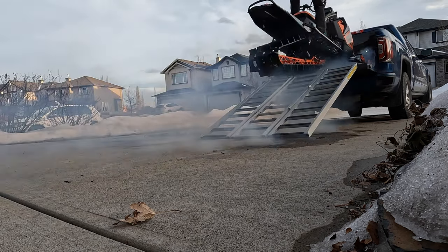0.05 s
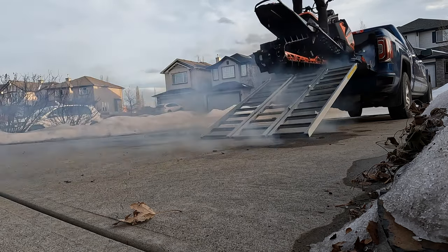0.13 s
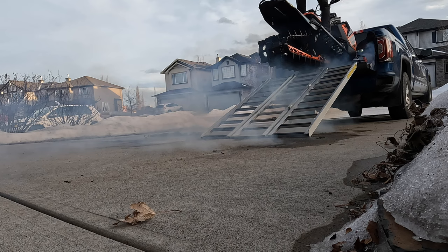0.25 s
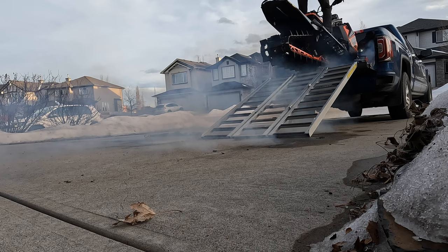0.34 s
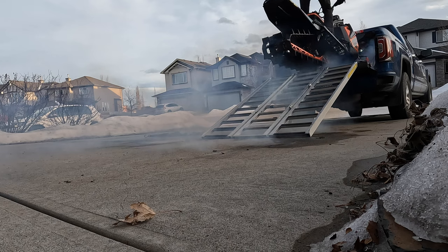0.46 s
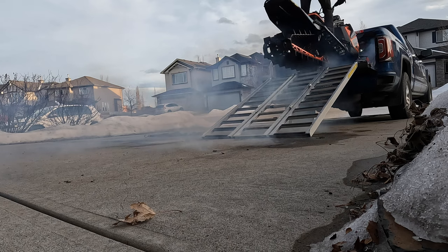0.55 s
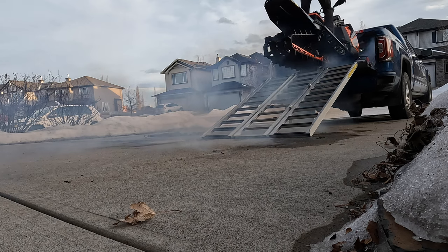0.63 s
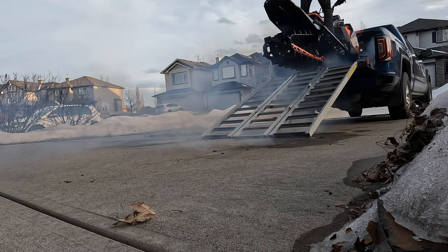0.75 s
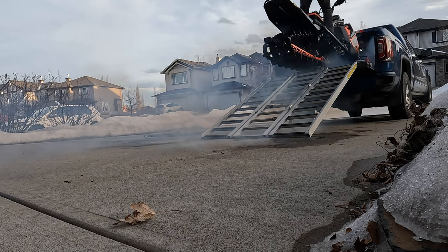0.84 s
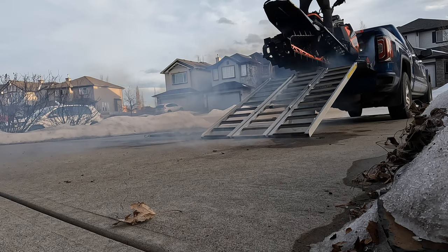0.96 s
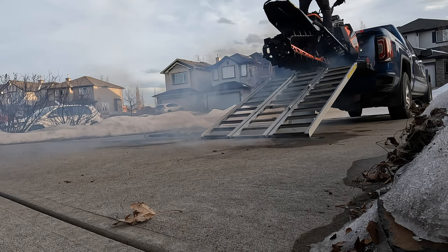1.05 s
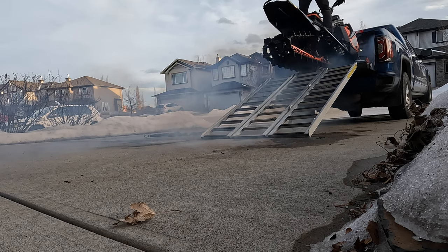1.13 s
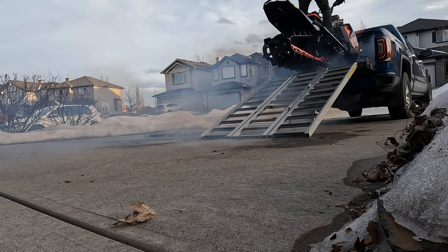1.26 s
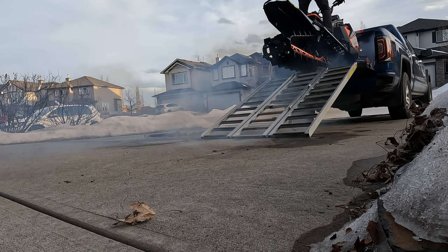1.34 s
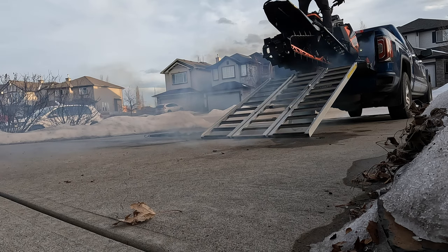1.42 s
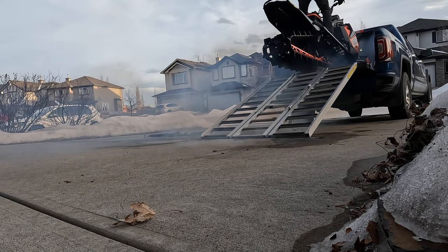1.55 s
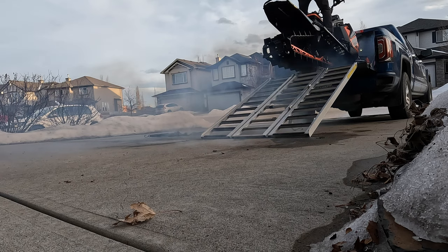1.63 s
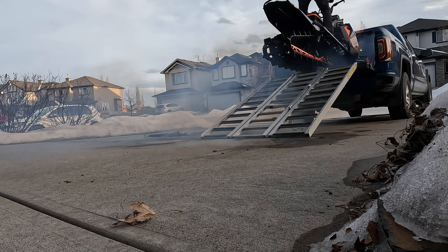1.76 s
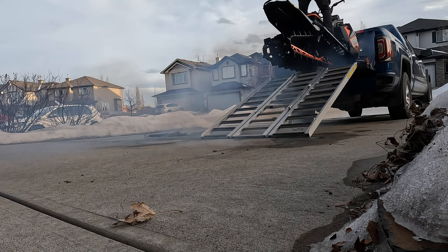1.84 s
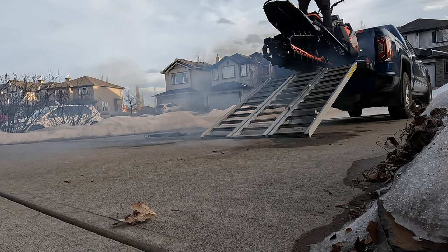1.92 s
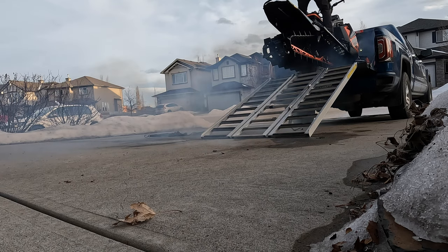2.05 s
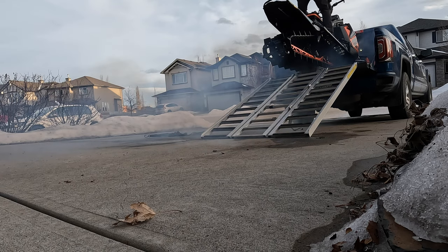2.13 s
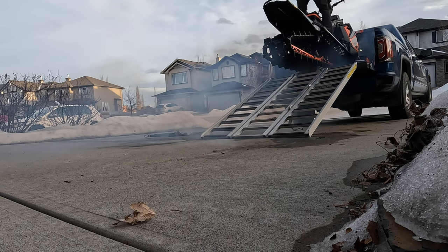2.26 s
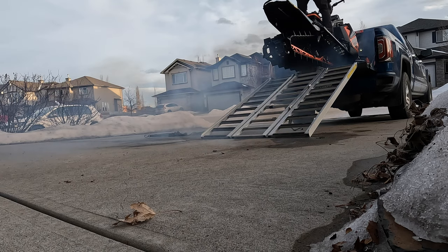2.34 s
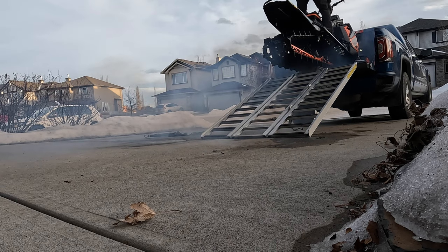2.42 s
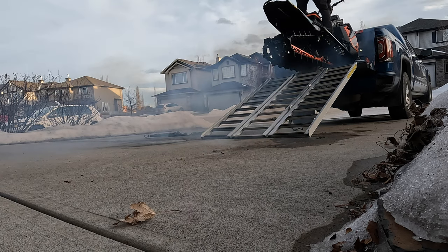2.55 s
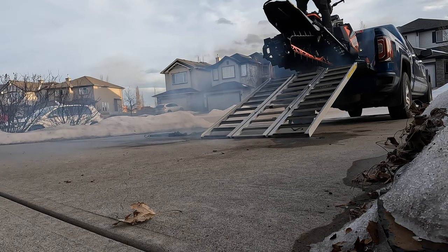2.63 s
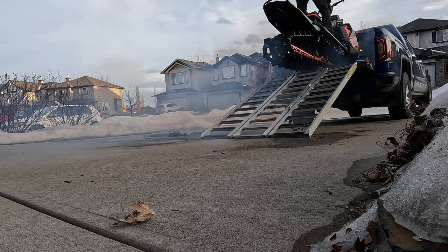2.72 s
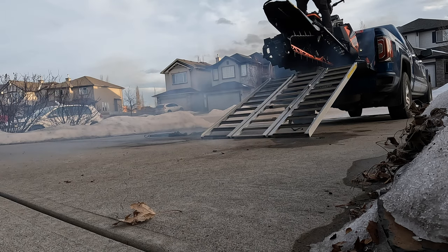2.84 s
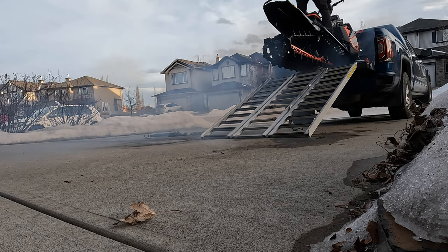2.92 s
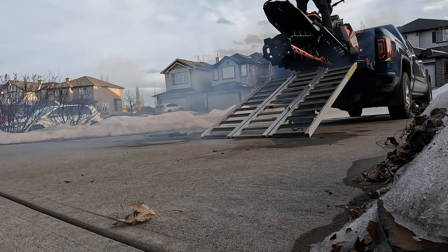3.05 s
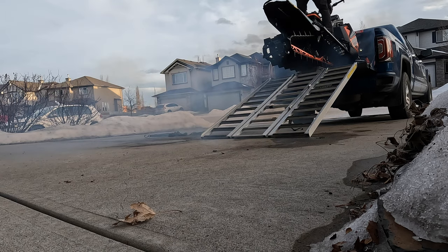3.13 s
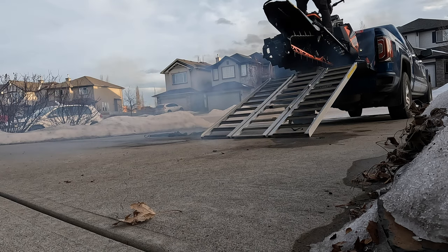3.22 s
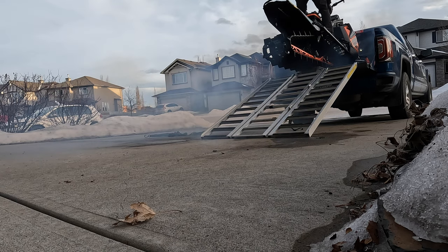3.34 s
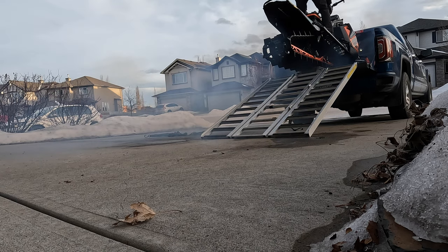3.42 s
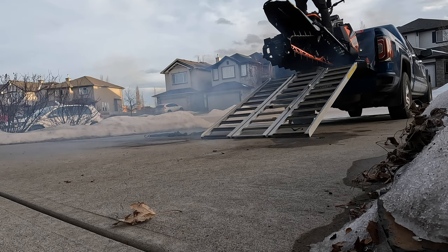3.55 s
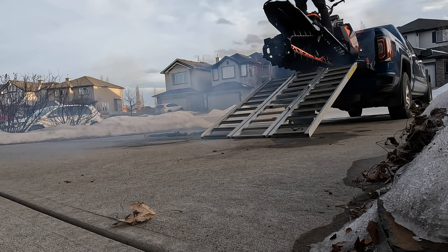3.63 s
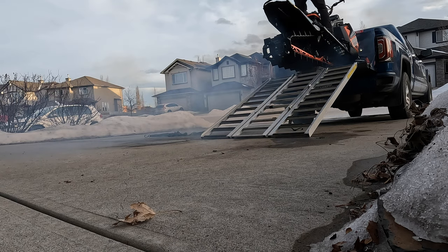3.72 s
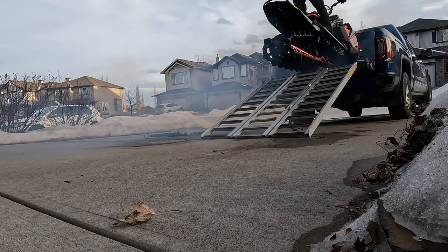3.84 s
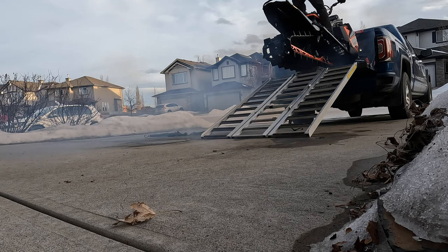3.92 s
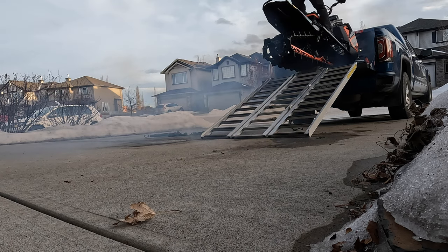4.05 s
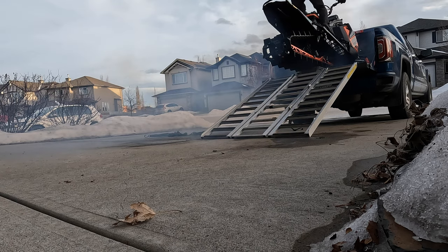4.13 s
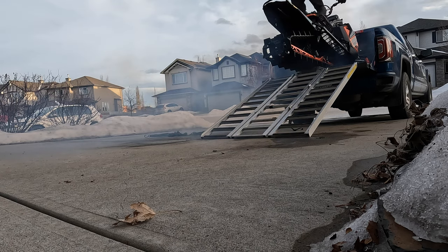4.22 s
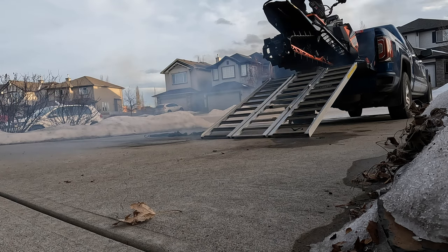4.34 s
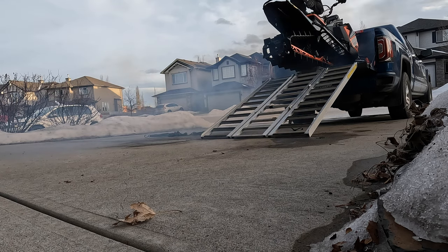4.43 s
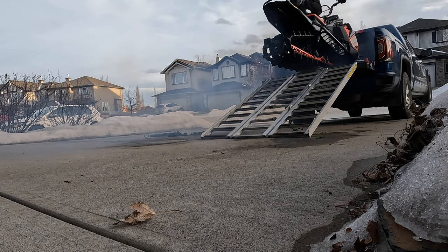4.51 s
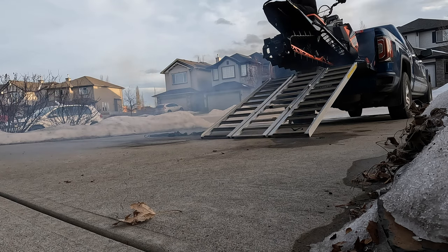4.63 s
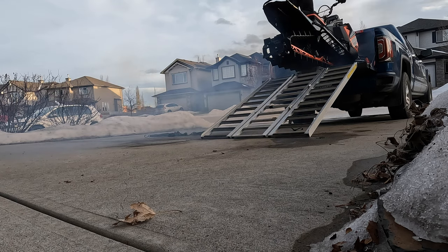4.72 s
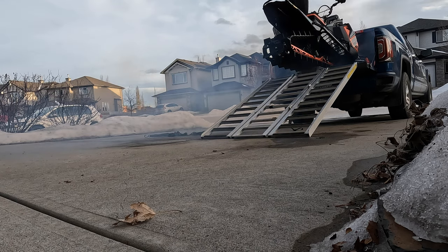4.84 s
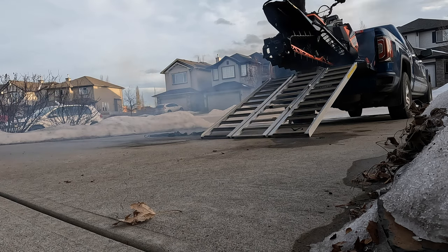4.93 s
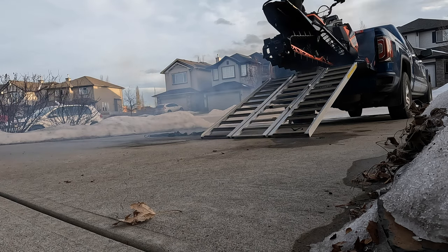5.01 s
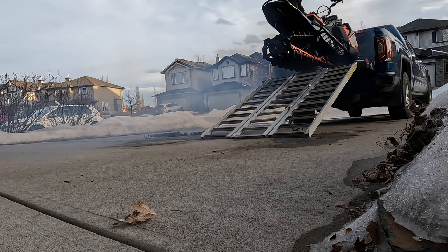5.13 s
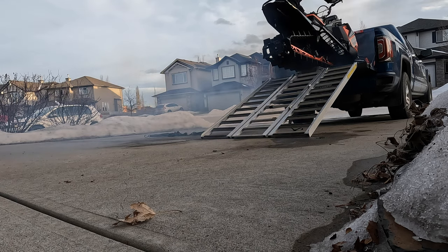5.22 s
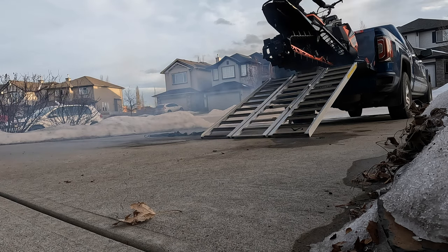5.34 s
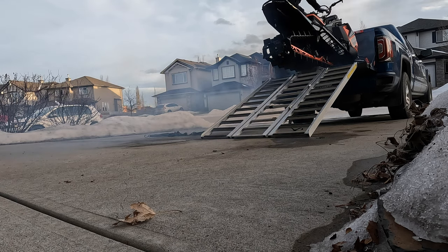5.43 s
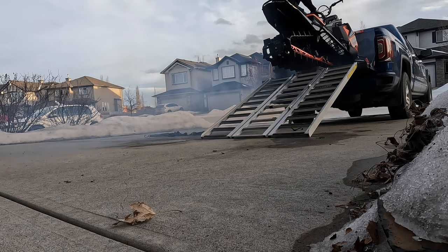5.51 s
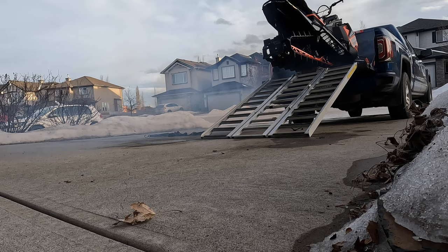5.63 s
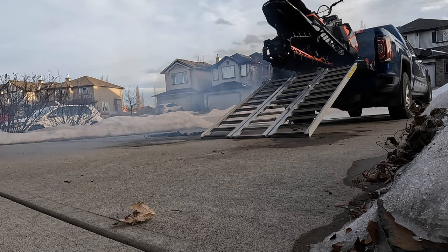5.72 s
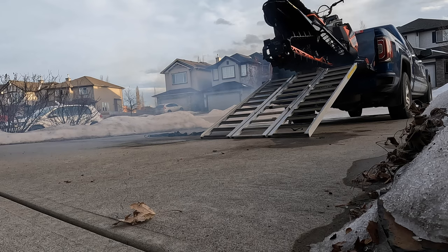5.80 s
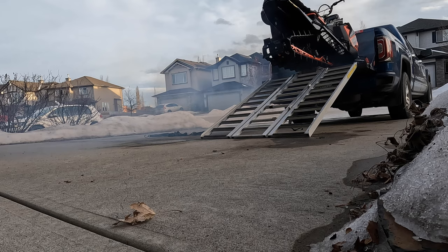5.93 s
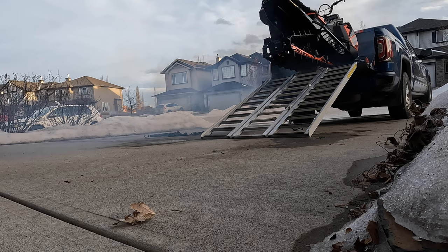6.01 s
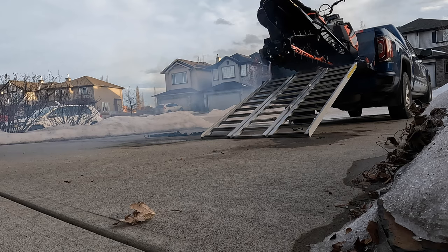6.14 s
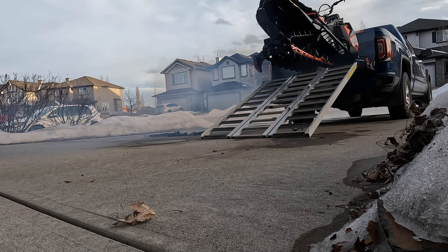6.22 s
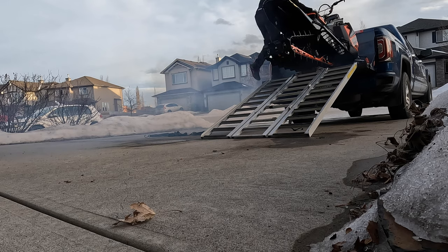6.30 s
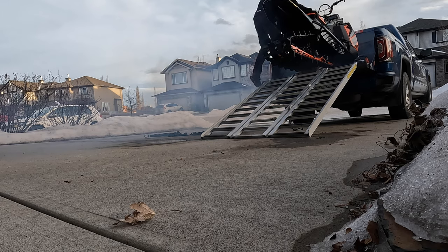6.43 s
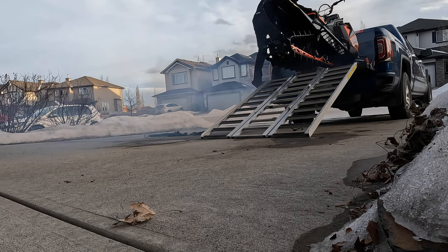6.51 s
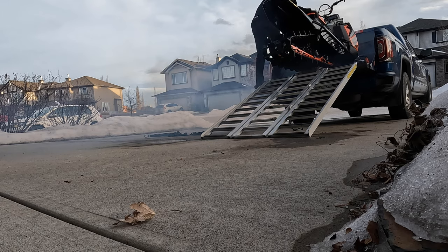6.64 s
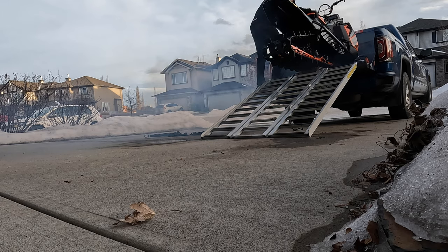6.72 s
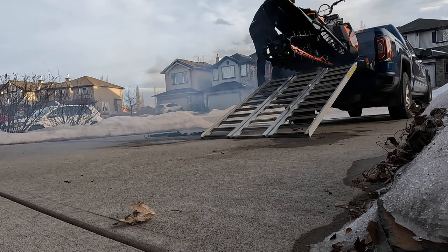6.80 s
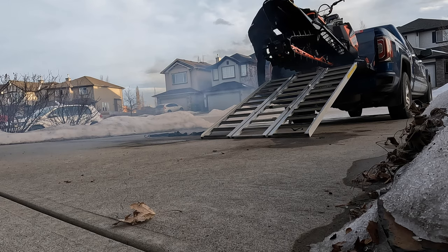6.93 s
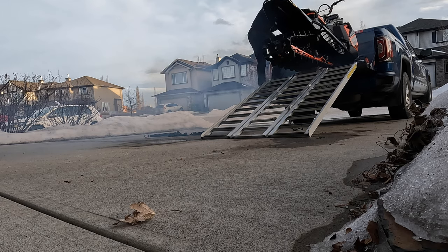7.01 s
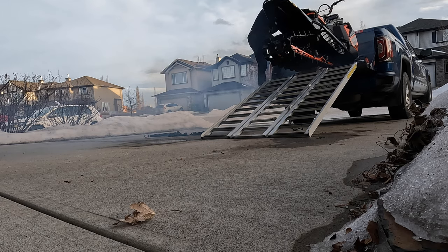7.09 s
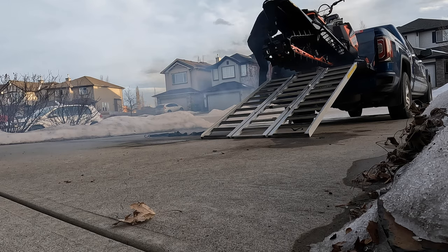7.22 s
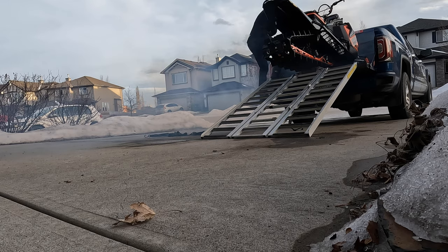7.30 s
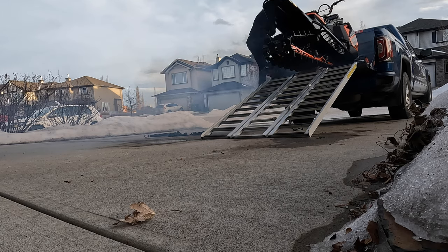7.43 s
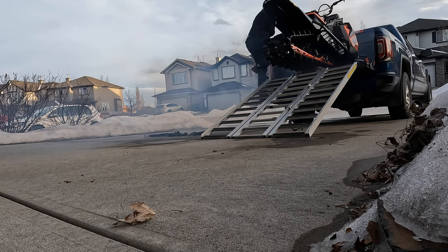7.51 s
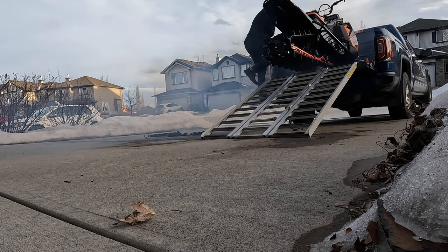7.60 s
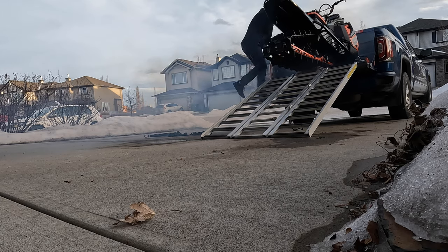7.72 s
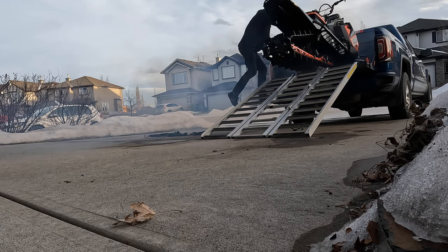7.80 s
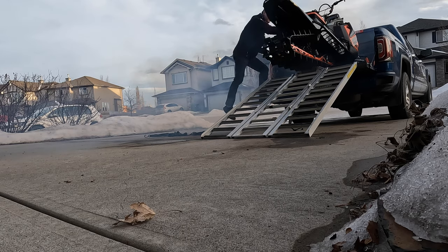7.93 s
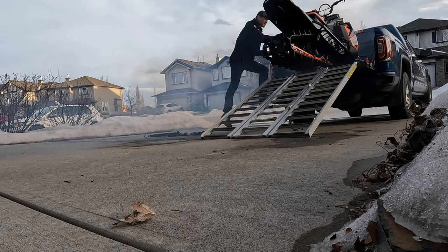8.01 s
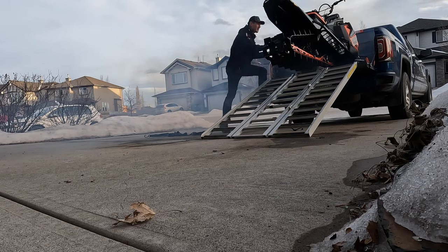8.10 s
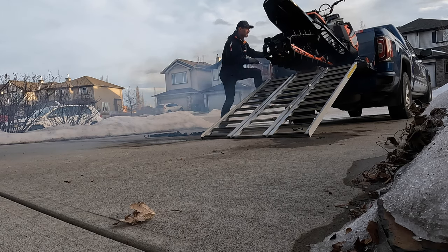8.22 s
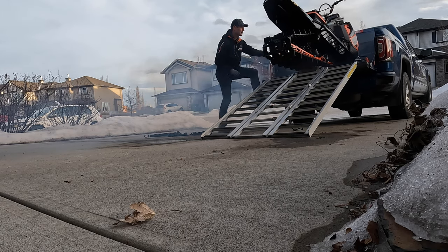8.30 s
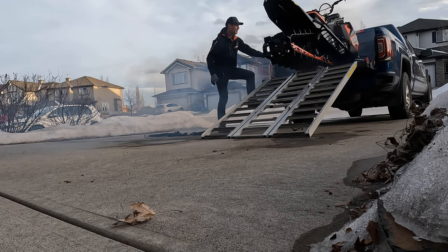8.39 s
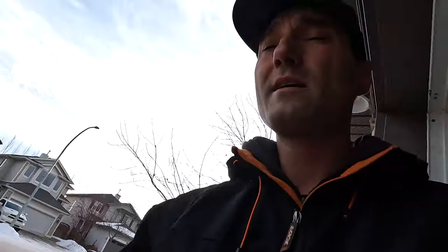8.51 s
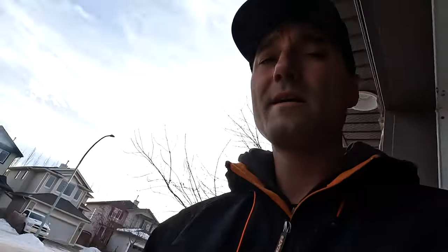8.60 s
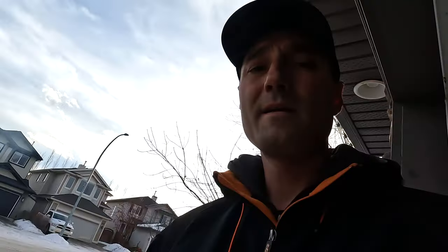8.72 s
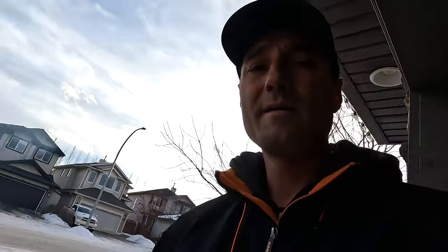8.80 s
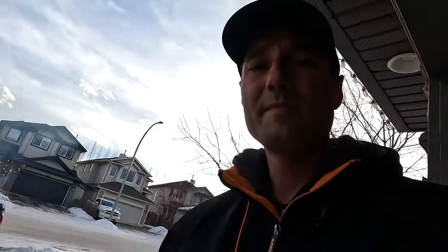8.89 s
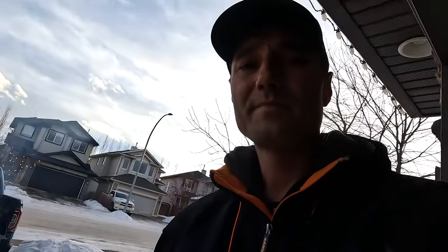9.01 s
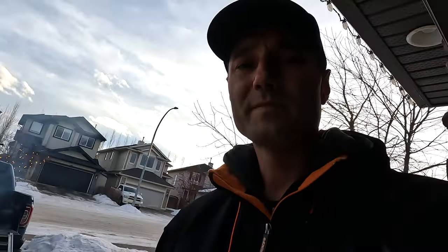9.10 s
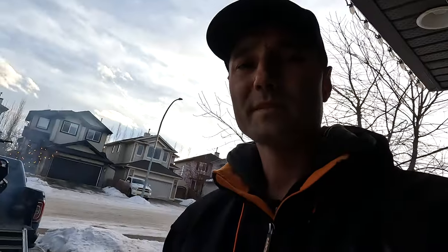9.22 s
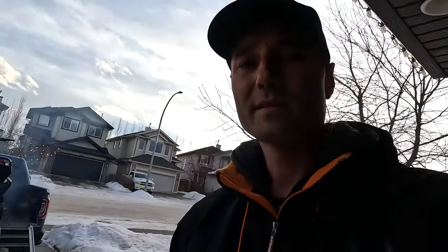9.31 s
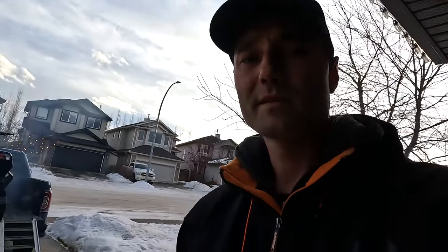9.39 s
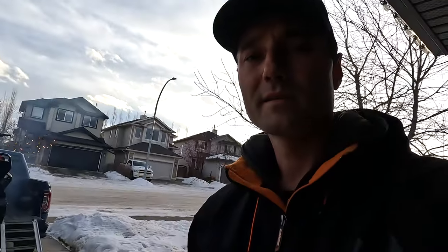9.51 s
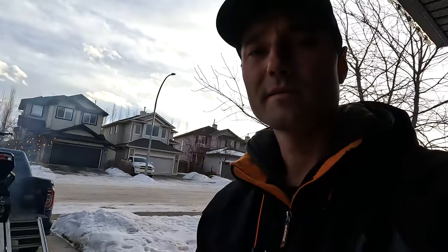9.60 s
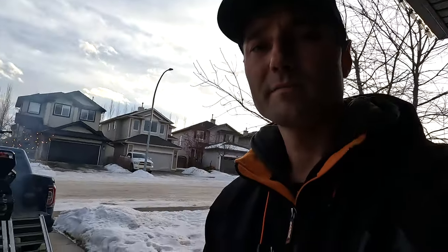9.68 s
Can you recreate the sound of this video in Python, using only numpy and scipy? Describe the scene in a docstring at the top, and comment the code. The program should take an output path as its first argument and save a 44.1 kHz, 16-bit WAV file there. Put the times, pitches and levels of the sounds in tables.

```python
"""A two-stroke snowmobile revs high, falls to a lumpy idle, is switched off and runs down.
It stands on a pickup's loading ramp. Every opening of its exhaust port puffs into the pipe, but the idle
fires only in bouts: a pop, its afterburn, often a second pop. The rider climbs off: boots knock and
scrape on the truck bed and the aluminium ramp, over light wind and far traffic. Then the scene jumps to
a quieter spot, where a jacket rustles."""
import sys
import numpy as np
from scipy import signal
from scipy.fft import rfft, irfft, next_fast_len
from scipy.io import wavfile
from scipy.ndimage import uniform_filter1d

SR = 44100
rng = np.random.default_rng(int(sys.argv[2]) if len(sys.argv) > 2 else 0)


def master(y):
    """Save y as 16-bit WAV."""
    cut = np.clip(np.atleast_2d(y).T, -1, 1)
    pcm = np.round(cut * 32767)  # scale
    wavfile.write(sys.argv[1], SR, pcm.astype(np.int16))


N = 429975
T = np.arange(N) / SR


def gain(db):
    """Turn decibels into a number to multiply by."""
    return 10 ** (np.asarray(db) / 20)

def unit(x):
    """Scale a signal to an average size (rms) of 1."""
    return x / np.sqrt(np.mean(x ** 2))

def curve(table):
    """Join rows of (time, value) with straight lines."""
    return np.interp(T, *np.transpose(table))

def wander(per_s):
    """Glide between random values, per_s of them a second."""
    return unit(np.interp(T * per_s, np.arange(N), rng.standard_normal(N)))

def colour(points, resonances=(), size=16384):
    """Make a filter (an impulse response) from a tone curve with resonant peaks on top."""
    f = np.arange(size // 2 + 1) * SR / size
    hz, db = np.transpose(points)
    db = np.interp(np.log(f + 1), np.log(hz), db)
    for centre, width, lift in resonances:
        db = db + lift / (1 + (2 * (f - centre) / width) ** 2)
    # make the filter ring after a hit, never before it
    cepstrum = irfft(np.log(gain(db)))
    cepstrum[1:size // 2] *= 2
    cepstrum[size // 2 + 1:] = 0
    impulse = irfft(np.exp(rfft(cepstrum)))
    return impulse / np.linalg.norm(impulse)

def through(x, impulse):
    """Pass a sound through a filter."""
    return signal.oaconvolve(x, impulse)[:N]

def noise(points, resonances=()):
    """Steady noise shaped by a tone curve."""
    return unit(through(rng.standard_normal(N), colour(points, resonances)))

def decay(t60, size=16384):
    """A fade that falls 60 dB in t60 seconds."""
    return np.exp(-np.log(1000) * T[:size] / max(t60, 1e-3))

def burst(t60, size=16384):
    """A fading puff of noise."""
    return rng.standard_normal(size) * decay(t60, size)

def swell(start, length, attack, release):
    """A level that rises, holds and dies away; all times in seconds."""
    return np.clip((T - start) / attack, 0, 1) * np.exp(-np.maximum(T - start - length, 0) / release)

def ring(modes, detune=0.023, size=16384):
    """One blow sets an object's notes ringing, a little differently at each contact point."""
    notes = np.zeros(size)
    for hz, db, t60 in modes:
        sign = rng.choice([-1, 1])
        pitch = hz * (1 + detune * rng.standard_normal())
        notes += gain(db) * sign * decay(t60) * np.sin(2 * np.pi * pitch * T[:size])
    return unit(notes) * np.sqrt(1024 / size)

def add(out, s, sound):
    """Mix a sound in at s seconds."""
    i = max(int(s * SR), 0)
    out[i:i + len(sound)] += sound[:N - i]

def taps(hits, tone, rattle_db, rattle_t60):
    """Light hits: each is a click with a short rattle after it."""
    clicks = np.zeros(N)
    for s, db in hits:
        add(clicks, s, gain([db]))
        add(clicks, s, gain(db + rattle_db) * burst(rattle_t60))
    return through(clicks, colour(tone))


# tone of the street at the quieter spot: f/Hz, level/dB
QUIET_TONE = [(8.8, -28), (15, -1.5), (27, -9), (114, -30), (370, -28), (584, -30.5), (778, -23.5),
              (1380, -32.5), (1940, -47), (2180, -45.5), (3250, -54.5), (14000, -72)]
def quiet_street():
    """Faint street noise that sways a little."""
    return noise(QUIET_TONE) * gain(-41.5 + 0.8 * wander(4))

# tone of far traffic: f/Hz, level/dB
TRAFFIC_TONE = [(12, -35), (20, -18), (49, 3.5), (103, -10.5), (136, -8.5), (180, -29.5), (207, -8),
                (382, -21), (533, -19.5), (704, -14), (1200, -14.5), (1580, -24), (2140, -39),
                (2750, -50.5), (9630, -51), (15500, -77.5)]
# how loud the traffic is: t/s, level/dB
TRAFFIC_LEVEL = [(4.6, -42), (5.25, -35.5), (5.8, -35.5), (6.6, -36), (7.6, -34.5), (8.5, -35.5)]
def traffic():
    """Far traffic murmurs and slowly swells."""
    return noise(TRAFFIC_TONE) * gain(curve(TRAFFIC_LEVEL) + 0.8 * wander(4))

def hum(hz=140, db=-40.5):
    """A low hum wavers for a second after the engine stops."""
    tone = unit(np.sin(2 * np.pi * hz * T + 0.58 * wander(5.8)))
    return gain(db) * tone * swell(4.7, 0.93, attack=0.25, release=0.04)

# tone of the wind: f/Hz, level/dB
WIND_TONE = [(15, -4.5), (35, -13), (70, -1), (130, -6.5), (250, -16.5), (500, -18), (1000, -63)]
# how loud the wind is: t/s, level/dB
GUSTS = [(4.55, -35.5), (4.8, -44), (5.28, -35), (5.45, -43), (5.75, -25.5), (6.55, -39), (7.24, -30.5),
         (8.03, -31.5), (8.3, -37.5), (8.5, -33)]
def wind():
    """Gusts rumble on the microphone."""
    return noise(WIND_TONE) * gain(curve(GUSTS))

# swishes of the jacket: t/s, length/s, level/dB
SWISHES = [(8.517, 0.04, -46.5), (8.55, 0.12, -42), (8.698, 0.18, -41)]
# tone of its cloth: f/Hz, level/dB
CLOTH_TONE = [(150, -17), (450, 1), (900, -1), (1800, -2), (2500, -10.5), (4000, -16), (7000, -27.5),
              (10000, -42), (15000, -70)]
def jacket():
    """Stiff cloth creases and folds as its wearer turns."""
    moving = sum(gain(db) * swell(s, length, 0.035, 0.072) for s, length, db in SWISHES)
    return noise(CLOTH_TONE) * moving * unit(gain(wander(500) + wander(59)))

# finger taps: t/s, level/dB
FINGER_TAPS = [(8.606, -16), (8.71, -15), (8.728, -27), (8.967, -18)]
# tone of the grip: f/Hz, level/dB
GRIP_TONE = [(100, -21), (350, 1), (640, 5), (1000, -7), (2000, -22), (5000, -40), (15000, -70)]
def fingers():
    """Fingers shift and tap on the camera's grip."""
    return taps(FINGER_TAPS, GRIP_TONE, rattle_db=-15, rattle_t60=0.052)

# tinks of the zip: t/s, level/dB
ZIP_TINKS = [(8.522, -58), (8.578, -56)]
# the note of its tag: f/Hz, level/dB, ring time/s
ZIP_NOTE = [(2630, 0, 0.2)]
def zip_tag():
    """The jacket's zip tag rings with one high note."""
    tinks = np.zeros(N)
    for s, db in ZIP_TINKS:
        add(tinks, s, gain(db) * ring(ZIP_NOTE, detune=0))
    return tinks

# how loud the rider's clothes rustle: t/s, level/dB
RUSTLE = [(5.6, -68), (5.7, -44), (6.4, -49), (6.55, -57), (7.05, -53), (7.25, -40), (7.65, -48.5),
          (7.9, -54), (8.15, -49), (8.3, -45), (8.39, -36)]
# slides of boots and clothes: t/s, length/s, rub/dB, grit/dB
SLIDES = [(5.106, 0.21, -48.5, -75), (5.722, 0.072, -32, -40), (5.785, 0.074, -35, -59),
          (5.972, 0.18, -38, -51.5), (6.02, 0.021, -36, -40.5), (6.254, 0.014, -23, -29),
          (6.375, 0.012, -42, -47.5), (6.68, 0.021, -65, -56.5), (6.829, 0.029, -42, -47),
          (7.16, 0.017, -31, -67), (7.413, 0.03, -34, -56), (7.467, 0.15, -40.5, -52.5),
          (7.738, 0.031, -35.5, -57), (7.974, 0.048, -44, -55), (8.391, 0.1, -30, -42)]
# tone of rubbing: f/Hz, level/dB
RUB_TONE = [(120, -53.5), (200, 4), (347, -2), (440, -8), (567, -8), (912, -9.5), (1610, -13.5),
            (2870, -17), (7000, -24), (9100, -68), (15400, -120)]
# tone of grit underfoot: f/Hz, level/dB
GRIT_TONE = [(3000, -36), (6000, -2.5), (8000, -3.5), (11000, -8), (13500, -13), (16000, -42)]
# tone of a hard contact: f/Hz, level/dB
CRACK_TONE = [(300, -58.5), (900, 9), (1400, 9.5), (2750, 4), (5400, 5), (7500, 4.5), (10000, -26),
              (15000, -34)]
# high pitches that the ramp boosts: f/Hz, width/Hz, boost/dB
RAMP_PEAKS = [(2400, 170, 0), (2940, 120, 8), (3690, 180, 5.5), (5100, 730, 2)]
def scuffs(grains_per_s=400):
    """Soles slide over the ramp, ringing its rungs and crushing grit; clothes rustle in between."""
    rub = gain(curve(RUSTLE)) * (T > RUSTLE[0][0])
    grit = rub * gain(-17)
    for s, length, rub_db, grit_db in SLIDES:
        slide = swell(s, length, attack=0.013, release=0.045)
        rub = np.maximum(rub, gain(rub_db) * slide)
        grit = np.maximum(grit, gain(grit_db) * slide)
    grains = unit((rng.random(N) < grains_per_s / SR) * rng.choice([-1, 1], N))
    crunch = gain(-7) * through(grains * rub, colour(CRACK_TONE, RAMP_PEAKS))
    sand = gain(-1) * through(grains * grit, colour(GRIT_TONE))
    scrape = noise(RUB_TONE, RAMP_PEAKS) * rub + noise(GRIT_TONE) * grit
    return (scrape + crunch + sand) * gain(1.2 * wander(45))

# creaks of a rung: t/s, length/s, f/Hz, level/dB
CREAKS = [(5.086, 0.024, 513, -29), (5.256, 0.023, 450, -26.5), (7.123, 0.033, 514, -16),
          (7.151, 0.036, 480, -15)]
def creaks():
    """A loaded rung sticks and slips in short, unsteady tones."""
    out = np.zeros(N)
    for s, length, hz, db in CREAKS:
        phase = (2 * np.pi * hz * T + 0.64 * wander(900))[:int(length * SR)]
        tone = np.sin(phase) + 0.3 * np.sin(2 * phase)
        add(out, s, gain(db) * signal.windows.tukey(len(phase)) * tone)
    return out

# heel taps: t/s, level/dB
HEEL_TAPS = [(8.1836, 5.5), (8.1867, -3)]
# their tone: f/Hz, level/dB
HEEL_TONE = [(200, -21), (600, -5), (1000, 5), (1500, 2.5), (2000, -16), (3500, -26), (7000, -32),
             (15000, -63)]
def heel():
    """A heel lands on the foot of the ramp and bounces."""
    return taps(HEEL_TAPS, HEEL_TONE, rattle_db=-29, rattle_t60=0.071)

# knocks of boots and sled: t/s, crack/dB, bed thud/dB, ramp clank/dB
KNOCKS = [(0.3319, -23.5, -41, -23), (5.0848, -41, -49, -41), (5.123, -51, -57, -36.5),
          (5.16, -55, -55, -38), (5.197, -50, -50, -38), (5.249, -39.5, -29.5, -34),
          (5.313, -46.5, -37, -40), (5.6358, -49, -17, -32.5), (5.6517, -48, -45, -45),
          (5.7521, -40, -41, -45), (5.8411, -33.5, -32, -29), (5.9526, -45, -29.5, -36),
          (6.0373, -31, -30, -62), (6.0937, -32.5, -42, -50), (6.262, -19, -57, -38),
          (6.2761, -29, -24, -28), (6.387, -38, -48, -49), (6.6962, -45, -38, -47), (6.856, -48, -33, -48),
          (7.1657, -37, -38, -23.5), (7.1764, -35, -43, -22), (7.1935, -52, -23, -29),
          (7.421, -37.5, -25, -44), (7.603, -35, -25, -35), (7.7464, -56, -51, -42), (7.902, -58, -35, -51),
          (8.002, -39.5, -54, -59), (8.41, -27.5, -31, -37), (8.458, -43, -26, -35), (8.505, -31, -22, -41)]
# low notes of the truck bed: f/Hz, level/dB, ring time/s
BED_NOTES = [(142, -3.5, 0.22), (176, 7.5, 0.22), (215, 5.5, 0.17), (254, 1, 0.3), (304.2, -0.5, 0.4),
             (348, -19.5, 0.13), (442, -7, 0.79)]
# notes of the ramp: f/Hz, level/dB, ring time/s
RAMP_NOTES = [(497, 8, 0.25), (579, -1, 0.18), (690, 4, 0.13), (860, 1, 0.089), (970, 8.5, 0.15),
              (1110, 6.5, 0.099), (1278, 6.5, 0.07), (1420, -5, 0.12), (1860, -2.5, 0.083),
              (2290, -5.5, 0.062), (2900, -17.5, 0.15), (4200, -17, 0.085), (4500, -11.5, 0.13)]
# bright notes of its rungs: f/Hz, level/dB, ring time/s
RUNG_NOTES = [(2422, -3, 0.15), (2740, -1.5, 0.16), (2930, -2, 0.13), (3190, -1.5, 0.11),
              (3870, -1.5, 0.12), (4780, -6, 0.12), (5383, -9, 0.15), (7360, -11, 0.14)]
def knocks():
    """Each knock snaps, crunches grit, thuds in the truck bed and clanks in the ramp and its rungs."""
    cracks, body = np.zeros((2, N))
    for s, crack, thud, clank in KNOCKS:
        add(cracks, s, gain(crack + 4) * burst(0.03) + gain(crack - 3) * burst(0.1))  # snap and tail
        add(body, s, gain(thud) * ring(BED_NOTES) + gain(clank) * ring(RAMP_NOTES))
        add(body, s, gain(crack - 9) * ring(RUNG_NOTES, detune=0.004))
    grit = gain(-11) * through(cracks, colour(GRIT_TONE))
    return body + through(cracks, colour(CRACK_TONE, RAMP_PEAKS)) + grit

# engine speed, as port openings a second: t/s, f/Hz
SPEED = [(0.0, 136), (0.2, 133), (0.34, 119.3), (0.55, 105.8), (0.89, 100.7), (1.31, 96.1), (1.85, 91.6),
         (2.43, 90.2), (2.69, 88.7), (2.78, 89.4), (3.01, 89.4), (3.41, 85), (3.608, 71.9), (3.8, 55),
         (3.9, 44.3), (3.97, 41.5), (4.02, 33), (4.09, 26.7), (4.2, 20)]
def crank(surge=0.021):
    """How often the exhaust port opens; the crank speeds up a little with each bout of pops."""
    return curve(SPEED) * (1 + surge * kicks(rise_s=0.046))

def strength(rate, full_hz, power, release):
    """An engine part gets quieter below the speed full_hz and dies away once the crank stalls."""
    stalled_s = np.maximum(T - SPEED[-1][0], 0)
    return np.minimum(rate / full_hz, 1) ** power * np.exp(-stalled_s / release)

# clanks of the clutch: t/s, level/dB
CLANKS = [(4.282, -28.5), (4.396, -28)]
# its notes: f/Hz, level/dB, ring time/s
CLUTCH_NOTES = [(252.6, 2, 0.52), (477, 3, 0.1), (500, -1.5, 0.51), (702, -7.5, 0.6), (1140, -12, 0.28),
                (2390, -15, 0.27), (2498, -20, 0.35), (2900, -25, 0.32), (3670, -23, 0.37),
                (5520, -32, 0.45)]
def clutch():
    """The clutch takes up its slack as the crank rocks back."""
    clanks = np.zeros(N)
    for s, db in CLANKS:
        add(clanks, s, gain(db) * ring(CLUTCH_NOTES, detune=0.0044))
    return clanks

# the engine's last strokes: t/s, boom/dB, pipe tone/dB, sigh/dB
LAST_STROKES = [(4.075, -14, -18, -37), (4.16, -24, -8, -38), (4.218, -13.5, -19, -25.5),
                (4.333, -14, -14.5, -22)]
# tone of the sigh: f/Hz, level/dB
SIGH_TONE = [(150, 15), (350, 4.5), (700, 1.5), (1100, -10), (1800, -16.5), (2600, -12), (3800, -23.5),
             (6000, -24.5), (14000, -55)]
def last_strokes(boom_hz=42, pipe_hz=163.5, rise_s=0.013, sigh_lag_s=0.056):
    """As the crank stops, each squeeze of a piston chugs in the pipe and unburnt air sighs out."""
    chugs, air = np.zeros((2, N))
    t = T[:8192]
    push = t / rise_s * np.exp(1 - t / rise_s)
    for s, boom, tone, sigh in LAST_STROKES:
        add(chugs, s, push * gain(boom) * np.sin(2 * np.pi * boom_hz * t))
        add(chugs, s, push * gain(tone) * np.sin(2 * np.pi * pipe_hz * t))
        add(air, s + sigh_lag_s, gain(sigh) * burst(0.46))
    return chugs + through(air, colour(SIGH_TONE))

# tone of the moving parts: f/Hz, level/dB
CLATTER_TONE = [(100, -18), (300, 11), (600, 4.5), (900, -1), (1300, -1.5), (1900, -4), (3000, -5),
                (4500, -12), (7000, -17), (8500, -25), (11000, -30), (13500, -37.5), (16000, -61.5)]
# pitches that the engine's metal boosts: f/Hz, width/Hz, boost/dB
METAL_PEAKS = [(1205, 140, 9), (1343, 43, 1.5), (2580, 140, -1), (4340, 150, 1.5), (4530, 150, 5),
               (5590, 67, 4.5), (6690, 160, 6.5), (7210, 150, 9), (7660, 91, 5.5), (9050, 110, 2.5),
               (10060, 220, 10.5)]
def clatter(cycles, rate, treble_hz=2200):
    """Pistons and clutch rattle, hardest after each port opening and bout, duller as the crank slows."""
    slap = 1 + 0.26 * np.exp(-(cycles % 1) / 0.84)
    rattle = noise(CLATTER_TONE, METAL_PEAKS) * slap
    hood = burst(0.2)  # the hood colours the rattle
    rattle = unit(rattle + 0.5 * through(rattle, hood / np.linalg.norm(hood)))
    lows = signal.sosfilt(signal.butter(1, treble_hz, fs=SR, output="sos"), rattle)
    body = lows * strength(rate, full_hz=85.2, power=1.055, release=0.03)
    treble = (rattle - lows) * strength(rate, full_hz=85.2, power=3.6, release=0.03)
    return (body + treble) * gain(-24.5 + 3 * kicks(rise_s=0.12) + 0.75 * wander(30.42))

# tone of rushing gas: f/Hz, level/dB
RASP_TONE = [(350, -43), (600, -15), (731, 11), (927, -14.5), (1470, 6), (2130, -7.5), (2430, -2),
             (3560, -16.5), (4510, -9.5), (6180, -34), (14000, -59)]
def rasp(cycles, rate):
    """At high revs gas tears through the ports; the rasp fades fast as the crank slows."""
    pulses = unit(np.exp(-(cycles % 1) / 0.7))
    return noise(RASP_TONE) * pulses * (rate / rate.max()) ** 7 * gain(-21)

def echo(x, round_trip_s=0.007, direct=0.85):
    """Sound bounces between the truck and the concrete, smearing each pulse in time."""
    bounces = np.zeros(8192)
    bounces[0] = direct
    for k in range(1, 12):
        bounces[int(k * round_trip_s * SR)] = (1 - direct ** 2) * (-direct) ** (k - 1)
    return through(x, bounces)

def hood_drone(flow, hz=328.6, t60=0.29):
    """The hood drones as overtones of the slowing puffs sweep through its own note."""
    fade = decay(t60)
    note = 2 * fade * np.sin(2 * np.pi * hz * T[:len(fade)]) / fade.sum()
    return through(flow, note) * gain(-8.5) * swell(3.7, 0.44, attack=0.18, release=0.05)

# overtones of the puffs: multiple of the port rate, level/dB
PUFF_OVERTONES = [(1, -9), (2, -2), (3, 0), (4, -1.5), (5, -5), (7, -6.5), (10, -13.5), (16, -6.5)]
# overall tone of the puffs: f/Hz, level/dB
PUFF_TONE = [(15, -27.5), (40, 3), (65, -16.5), (90, 0), (130, -7.5), (190, 2.5), (270, -1), (340, -9.5),
             (430, -12), (700, -33), (1200, -27), (3000, -67.5)]
# pitches that pipe and silencer boost: f/Hz, width/Hz, boost/dB
PIPE_PEAKS = [(38.1, 7.8, 12), (60.2, 14, 16.5), (125, 7.9, 14.5), (163, 28, 14.5), (224.3, 33, 3),
              (283, 30, 2), (333.4, 19, 6), (485.5, 23.5, 13.5), (609.5, 35, 13.5), (746, 104, 15),
              (1010, 54, 12), (1181, 30, 13), (1232, 30, 17.5), (1334, 38, 13.5), (1418, 38, 13.5),
              (1517, 26, 2), (1877, 87, 11), (2390, 300, 11.5)]
RACING_HZ = 125  # above this port rate the engine fires steadily
def puffs(cycles, rate, switch_off_s=3.43):
    """Every port opening, fired or not, breathes into the pipe; once switched off, the puffs even out."""
    unrest = np.interp(T, [switch_off_s, switch_off_s + 0.042], [1, 0.15])
    angle = 2 * np.pi * (cycles + 0.011 * unrest * wander(90))
    multiples, db = np.transpose(PUFF_OVERTONES)
    flow = sum(gain(np.interp(k, multiples, db)) * np.sin(k * angle) for k in range(1, 17))
    # swirling gas makes every puff a little different and keeps the pipe ringing
    swirl = gain(-7.5) * unrest * wander(1100)
    uneven_flow = flow * gain(3.5 * unrest * wander(120)) + swirl
    drone = echo(through(uneven_flow, colour(PUFF_TONE, PIPE_PEAKS)))
    energy = uniform_filter1d(drone ** 2, size=6000)
    steady_drone = drone / np.sqrt(np.abs(energy) + 1e-9)
    racing = uniform_filter1d(1. * (rate > RACING_HZ), size=4000)
    level = strength(rate, full_hz=41.77, power=1.74, release=0.07) * gain(-10 + 3 * racing)
    return steady_drone * level + hood_drone(flow)

# bouts of the idle, about nine a second: t/s, first pop/dB, afterburn/dB, second pop/dB
BOUTS = [(0.3338, -6, -12.5, -10), (0.4807, -8, -23.5, -33.5), (0.5918, -7.5, -23.5, -12),
         (0.706, -7, -7.5, -9), (0.823, -8.5, -15, -10), (0.9435, -8, -5, -28), (1.056, -8, -13, -26.5),
         (1.1405, -10.5, -7, -27), (1.1727, -6, -15.5, -9.5), (1.2998, -9.5, -12, -15),
         (1.4051, -9.0, -19.5, -26), (1.513, -6.5, -26, -19.5), (1.5875, -9.5, -24, -8.5),
         (1.6968, -10, -14, -10), (1.808, -10, -28, -9.5), (1.918, -10.5, -14.5, -10),
         (2.0509, -8, -11.5, -8.5), (2.1616, -8.5, -12, -10), (2.286, -14.0, -3, -27.5),
         (2.4062, -7.0, -9, -21), (2.5179, -8.5, -7, -26.5), (2.631, -9.5, -9.5, -10.5),
         (2.7431, -10.5, -8.5, -10), (2.8542, -6.5, -12, -9), (2.968, -11.0, -26.5, -8),
         (3.0581, -10, -14.5, -24), (3.139, -8, -9, -25), (3.253, -7, -16.5, -11.5),
         (3.366, -6.5, -17.5, -11)]
def firings(cycles, rate):
    """List when the fuel fires, as rows of t/s, level/dB, extra boom/dB, extra ring/dB."""
    fires = (np.diff(cycles // 4) > 0) & (rate[1:] > RACING_HZ)  # every fourth opening at high revs
    rows = [(s, -8, -24.5, -9) for s in T[1:][fires]]
    for s, first, afterburn, second in BOUTS:
        period = 1 / np.interp(s, T, rate)
        rows += [(s, first, 3, 0), (s + period, afterburn, -6, -2), (s + 3 * period, second, 3, 0)]
    return rows

def kicks(rise_s):
    """The push on the crank peaks after every bout and sags before the next."""
    push = np.zeros(N)
    age = T[:16384] / rise_s
    for s, *_ in BOUTS:
        add(push, s, age * np.exp(1 - age))
    return push - uniform_filter1d(push, size=10000)

# tone of a pop's boom: f/Hz, level/dB
BOOM_TONE = [(15, 4.5), (30, 1.5), (60, -4.5), (95, 0.5), (150, 2), (230, -0.5), (350, -19), (500, -8),
             (800, -29), (1500, -16.5), (4000, -91.5)]
# tone of its sharp shock front: f/Hz, level/dB
SHOCK_TONE = [(150, 0.5), (400, -6.5), (650, 1.5), (900, -10.5), (1300, 3.5), (2500, 17), (3500, -35),
              (7000, -50), (16000, -68)]
# pitches that the silencer's outlet boosts: f/Hz, width/Hz, boost/dB
OUTLET_PEAKS = [(500, 90, 5), (1300, 220, 4.5), (2520, 300, 4.5)]
# tone of the crack of gas: f/Hz, level/dB
GAS_TONE = [(150, 11), (400, 2.5), (650, 6), (900, -15), (1300, -0.5), (2000, -3.5), (2700, -3.5),
            (3300, -13.5), (4600, -12), (6500, -24.5), (9000, -31.5), (13000, -42), (16000, -58)]
# tone of the tail left in the pipe: f/Hz, level/dB
TAIL_TONE = [(150, -7), (450, 9.5), (650, -2.5), (900, -6), (1300, 2.5), (1900, -0.5), (2700, -5.5),
             (3500, -13.5), (6500, -9.5), (14000, -48.5)]
# notes of the silencer's shell: f/Hz, level/dB, ring time/s
SHELL_NOTES = [(483.1, 3.5, 0.26), (596, -6.5, 0.11), (1197, -3, 0.17), (1221, -2, 0.19),
               (1322, -2.5, 0.11), (1430, -5, 0.11), (1530, -15, 0.11), (2405, -7.5, 0.049),
               (2560, -2.5, 0.06)]
def pops(cycles, rate, boom_lag_s=0.001975):
    """Each firing booms down the pipe with a shock front and a crack of gas, and rings the silencer."""
    boom, shock, gas, tail, shell = np.zeros((5, N))
    for s, db, boom_db, ring_db in firings(cycles, rate):
        add(boom, s + boom_lag_s, gain([db + boom_db + 28]))
        add(shock, s, gain([db + 7.5]))
        add(gas, s, gain(db - 1) * burst(0.02))
        add(tail, s, gain(db - 12) * burst(0.099))
        add(shell, s, gain(db + ring_db - 11) * ring(SHELL_NOTES, detune=0.0027))
    exhaust = through(boom, colour(BOOM_TONE, PIPE_PEAKS))
    exhaust += through(shock, colour(SHOCK_TONE, OUTLET_PEAKS))
    exhaust += through(gas, colour(GAS_TONE, METAL_PEAKS))
    exhaust += through(tail, colour(TAIL_TONE, PIPE_PEAKS))
    return shell + echo(exhaust)

# how wide the sound is, most in the treble: f/Hz, side minus middle/dB
WIDTH = [(30, -48.5), (65, -34.5), (110, -25.5), (200, -21.5), (400, -11), (800, -9.5), (1400, -6.5),
         (4000, -5.5), (9000, -5.5), (13000, -3)]
# how the two microphones differ in tone: f/Hz, left minus right/dB
LEFT_RIGHT = [(100, 0.5), (200, -0.7), (700, -1.5), (1290, 2), (2380, -2.5), (4400, -2), (8100, 0),
              (12000, 4)]
def stereo(x):
    """Reflections off the truck and the houses reach two close microphones differently."""
    scatter = burst(0.16)
    reflections = through(x, scatter / np.linalg.norm(scatter))
    widths = gain(np.interp(np.linspace(0, SR / 2, 1024), *np.transpose(WIDTH)))
    side = gain(-1) * np.sqrt(np.mean(widths ** 2)) * through(reflections, colour(WIDTH))
    size = next_fast_len(N)
    lean_db = np.interp(np.arange(size // 2 + 1) * SR / size, *np.transpose(LEFT_RIGHT))
    spectra = rfft([x + side, x - side], size) * gain([lean_db / 2, -lean_db / 2])
    return irfft(spectra, size)[:, :N]

def scene(jump_s=8.521):
    """Snowmobile and rider on a driveway, then a jump to the quieter spot."""
    rate = crank()
    cycles = np.cumsum(rate) / SR  # counts the port openings
    engine = puffs(cycles, rate) + pops(cycles, rate) + rasp(cycles, rate) + clatter(cycles, rate)
    stopping = last_strokes() + clutch()
    rider = knocks() + creaks() + heel() + scuffs()
    driveway = traffic() + hum() + wind() + rider + stopping + engine
    quiet_spot = quiet_street() + jacket() + fingers() + zip_tag()
    before_jump = np.clip((jump_s - T) / 0.004, 0, 1)
    return stereo(before_jump * driveway + (1 - before_jump) * quiet_spot)

def record(dry, low_hz=6, top_hz=15200):
    """Block the lowest rumble, round off the loudest peaks and cut the highest treble."""
    dry = signal.sosfilt(signal.butter(1, low_hz, "high", fs=SR, output="sos"), dry, axis=-1)
    rounded = dry / (1 + np.abs(dry) ** 6) ** (1 / 6)
    return signal.sosfilt(signal.ellip(8, .2, 70, top_hz, fs=SR, output="sos"), rounded, axis=-1)


dry = scene()
out = record(dry)
master(out)
```